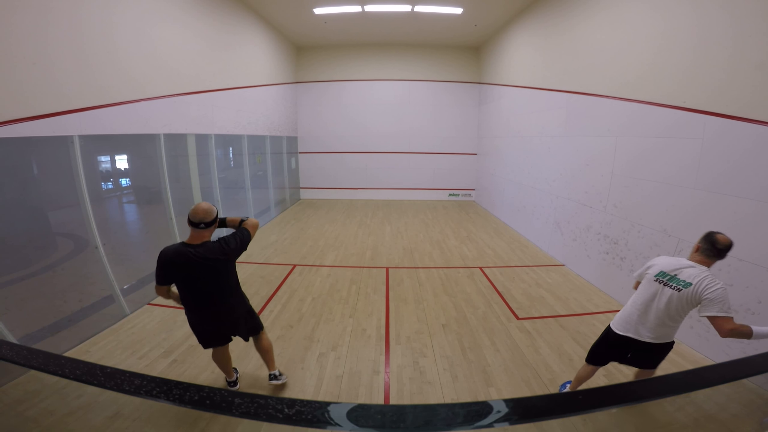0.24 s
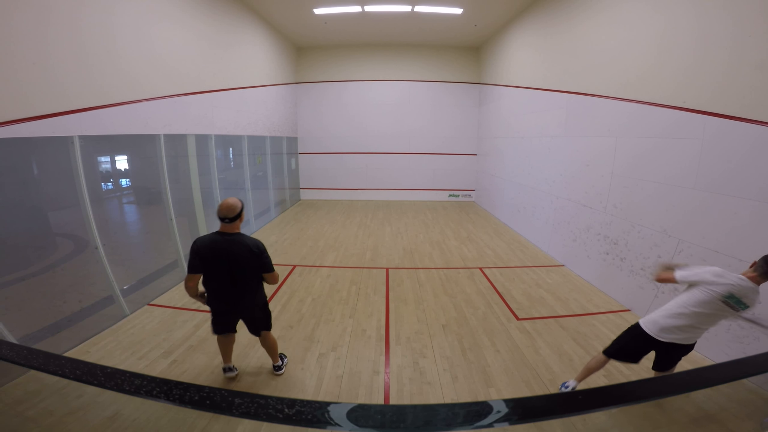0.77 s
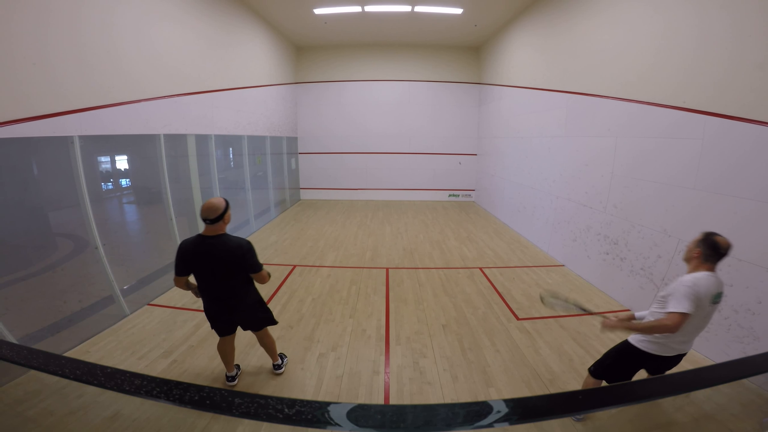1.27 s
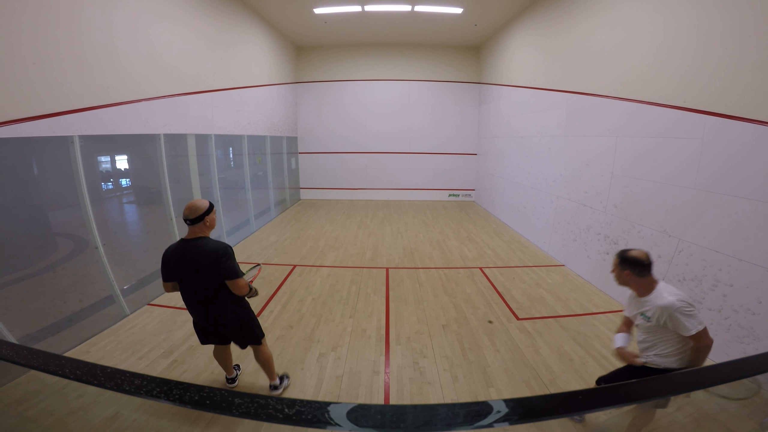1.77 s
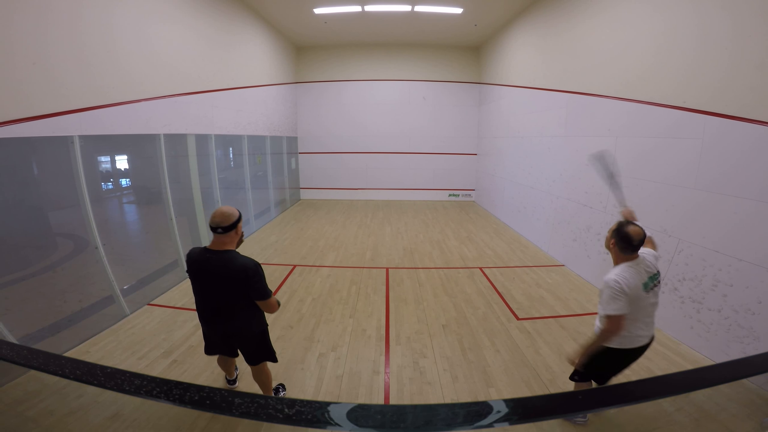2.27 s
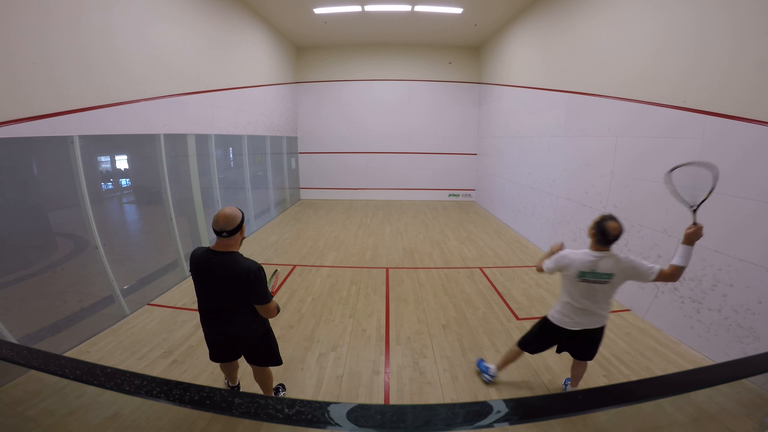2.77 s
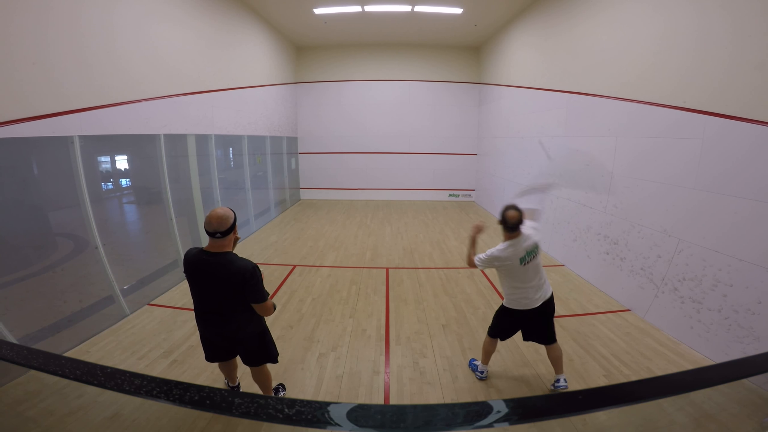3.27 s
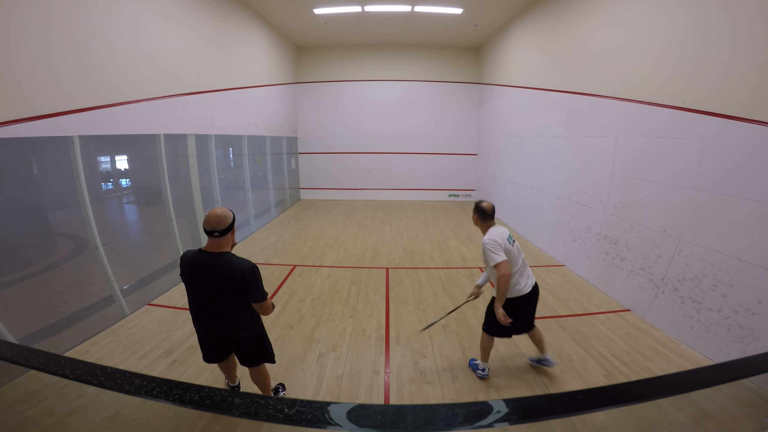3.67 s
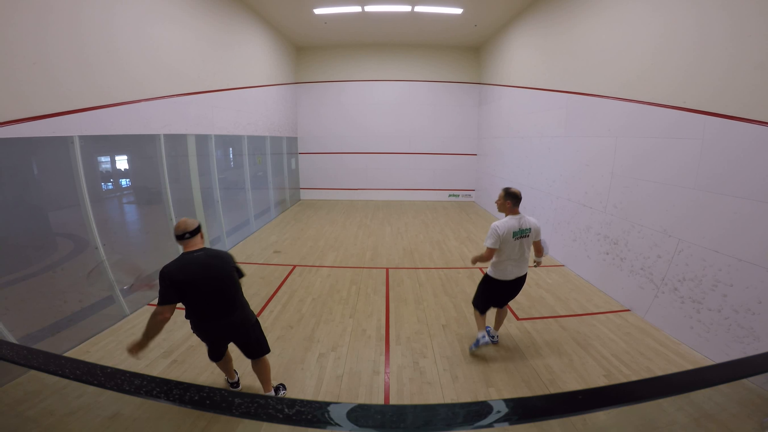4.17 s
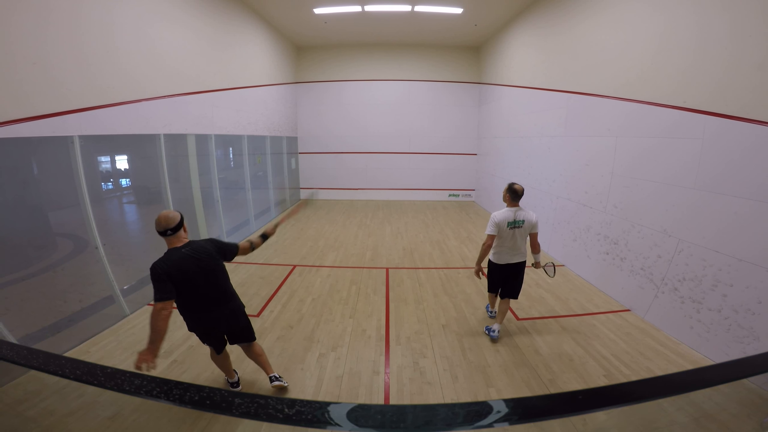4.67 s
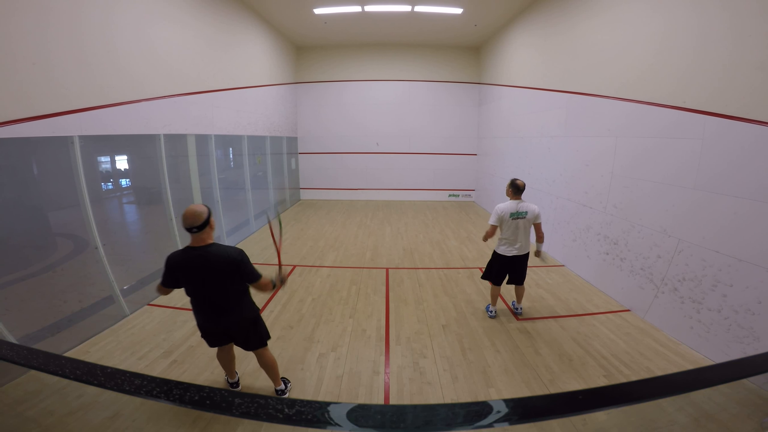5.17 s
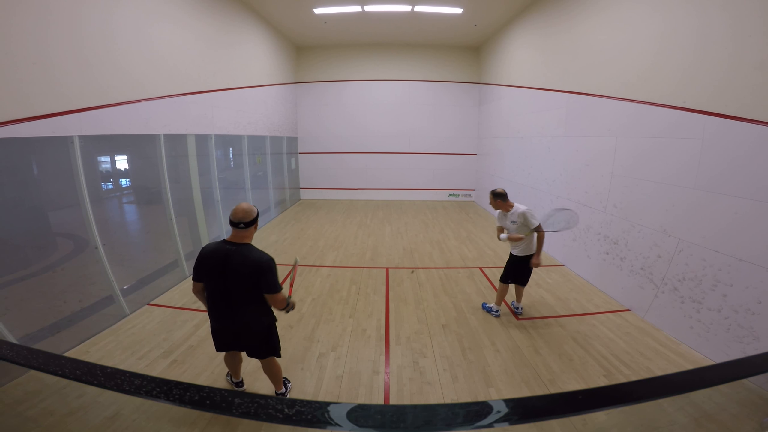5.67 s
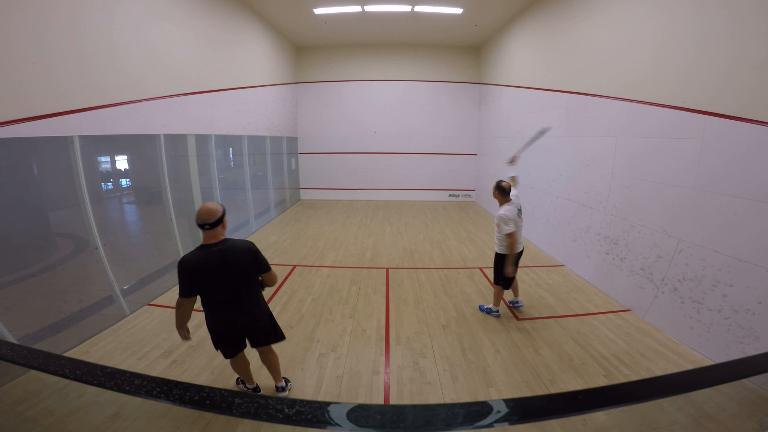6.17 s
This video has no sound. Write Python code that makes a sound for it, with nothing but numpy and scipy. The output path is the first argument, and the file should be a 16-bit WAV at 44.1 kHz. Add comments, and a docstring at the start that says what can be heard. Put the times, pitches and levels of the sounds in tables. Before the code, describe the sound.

The echo of an earlier wall hit is fading as a rally goes on in a bare, hard-walled court. Racquet cracks with a hollow pock alternate with louder, booming ball smacks on the front wall, about one impact every half to one second. The ball bounces dully on sprung boards, feet thud, and a sole squeaks faintly early on. Long reverberation and low hum fill the gaps; one fixed microphone at the back, mono.

```python
"""The echo of a ball on the front wall already rings through a closed court as the scene opens; a rally follows.
Racquets crack against a hollow rubber ball, which booms off the front wall and bounces on sprung boards.
Each blow is a minimum-phase pulse convolved with discrete reflections and a diffuse tail that rings for seconds.
The floor thuds as damped swings under feet and ball, and a sole squeaks as an unsteady tone; beating hum and
filtered-noise ventilation lie underneath."""
import sys
import numpy as np
from scipy import signal
from scipy.fft import rfft, irfft
from scipy.io import wavfile
from scipy.ndimage import uniform_filter1d

SR = 44100
rng = np.random.default_rng(int(sys.argv[2]) if len(sys.argv) > 2 else 0)


def put_to_file(sound):
    """Save the sound as 16-bit audio at rate SR, in the file named by the first command-line argument."""
    columns = np.atleast_2d(sound).T  # one column per channel
    safe = np.clip(columns, -1, 1)
    whole_steps = np.round(safe * 32767)
    wavfile.write(sys.argv[1], SR, whole_steps.astype(np.int16))


N = 283563
RING_SAMPLES = 3 * SR  # length of the court's response

# Ball on the front wall. Each row: start in seconds (negative: before the scene opens), boom peak in dB,
# boom lag in seconds, straight path in dB and early arrivals in dB (these two add up),
# then the blow's base level, thump, smack and crack in dB.
FRONT_WALL_HITS = [(-0.42, -20, .005, -8, 34, -16.5, 1, -3.5, 11),
                   (1.1134, -9.5, 0.009, -5, 34, -14.5, -1, 3.5, 11),
                   (2.3835, -8, 0.0028, -8, 35.5, -20, 2, -2.5, 6),
                   (3.575, -5.5, .012, -7, 37, -13, -.5, 2.5, 10),
                   (4.9257, -13, 0.0021, -9.5, 37, -19, -1, -3, 5),
                   (6.258, -21.5, .005, -7.5, 37.5, -20.5, 0, -3, 5.5)]


def racquets():
    """Impact excitation: a stroke cracks, the ball pocks, and the strings ping and sing on unsteadily."""
    # Each row: start in seconds, pock peak before its path levels in dB, string ping peak in dB,
    # string sustain at its onset in dB, the blow's base level, thump, smack and crack in dB,
    # string pitch in Hz, full string ring in dB.
    strokes = [(0.890, -13, -32, -49, -23.5, 3, 1.5, 2, 2120, -1),
               (2.015, -20.5, -33, -47.5, -32, 4, 0, 4, 1310, 7.5),
               (3.375, -17, -33, -49, -25, 4, 1.5, 0.5, 2044, -2.5),
               (4.552, -24, -42, -54, -36.5, 9, -2, 0.5, 1305, 7.5),
               (5.979, -31, -42.5, -50, -36, 11, -1, 8.5, 1345, 15.5)]
    # Spectrum of a racquet blow. Each row: frequency in Hz, relative level in dB.
    colour = [(60, -3), (170, -5), (335, 2), (520, -11), (700, -16.5), (860, -11), (1030, -14.5),
              (1450, -21.5), (2130, -18), (3000, -21.5), (3950, -16.5), (4850, -28.5), (7350, -21.5),
              (10000, -33.5), (12300, -28.5), (14800, -32.5)]
    # Arrivals from mid-court. Each row: delay in seconds, relative level in dB, smear in seconds.
    mid_paths = [(0, -6, 0.002), (.002, -2, 0.004), (0.017, -9.5, 0.0033), (0.03, -20, 0.0046),
                 (.044, -16.5, .006), (.055, -9, 0.018)]
    # The pock and its returns from side wall and ceiling. Each row: delay in seconds, level in dB.
    pock_paths = [(0.002, -7), (0.021, -9), (0.048, -7)]
    pock_hz, pock_peak_s, ping_peak_s = 338, 0.0031, 0.003
    sustain_t60_s, waver, waver_hz = 1.7, 0.55, 16

    out, t = np.zeros(N), np.arange(SR) / SR
    pock = swing(t, pock_peak_s) * np.sin(2 * np.pi * pock_hz * t)
    for s, pock_db, ping_db, sustain_db, *strike, string_hz, string_db in strokes:
        event = (s, *strike, string_hz, string_db)
        out += ball([event], colour, mid_paths, early_db=28.5, body_db=2, fill_s=0.015)
        ping = swing(t, ping_peak_s) * np.sin(2 * np.pi * string_hz * t)
        decay = np.exp(-np.log(1000) * t / sustain_t60_s)
        sustain = wavering(string_hz, waver, waver_hz)[:SR] * decay
        add(out, s, undb(ping_db) * ping + undb(sustain_db) * sustain)
        for delay, db in pock_paths:
            add(out, s + delay, undb(pock_db + db) * pock)
    return out


def wall_hits():
    """Impact and structural coupling: the ball smacks the front wall, which booms and shakes the floor."""
    # Spectrum of a wall blow. Each row: frequency in Hz, relative level in dB.
    colour = [(40, -29), (100, -0.5), (210, 0), (310, 6.5), (560, -7), (800, -7.5), (1080, -14.5),
              (1270, -17), (1920, -19.5), (3190, -25), (4050, -25), (5000, -41), (7200, -33.5),
              (10000, -40.5), (12000, -38), (14800, -44)]
    # Reflected paths from the front wall. Each row: delay in seconds, relative level in dB, smear in seconds.
    front_paths = [(.0052, -6.5, 0.0041), (.0066, -11.5, 0.001), (0.0128, -10, 0.0046),
                   (0.021, -13.5, 0.0063), (0.058, -14.5, 0.0067), (.066, -10.5, 0.006),
                   (.073, -14.5, .006), (.082, -18, 0.0049), (.108, -20, .012), (0.127, -20.5, 0.01),
                   (.143, -16, 0.0067)]
    straight_smear_s = 0.0063
    shake_lag_s, shake_db, shake_hz = 0.018, -20, 95

    out = wall_boom()
    for s, _, _, straight_db, early_db, *strike in FRONT_WALL_HITS:
        paths = [(0, straight_db, straight_smear_s), *front_paths]
        out += ball([(s, *strike)], colour, paths, early_db, body_db=-7, fill_s=0.062)
        add(out, s + shake_lag_s, undb(shake_db) * boards(shake_hz))
    return out


def wall_boom(low_hz=272, high_hz=350, high_db=-3, peak_s=0.0062):
    """Modal superposition: the struck wall swings for a few cycles in two modes."""
    out, t = np.zeros(N), np.arange(SR // 8) / SR
    low_mode = np.sin(2 * np.pi * low_hz * t)
    high_mode = undb(high_db) * np.sin(2 * np.pi * high_hz * t)
    boom = swing(t, peak_s) * (low_mode - high_mode)
    for s, db, lag_s, *_ in FRONT_WALL_HITS:
        add(out, s + lag_s, undb(db) * boom / abs(boom).max())
    return out


def bounces():
    """Impact on a compliant surface: the ball pats the floor and sets the boards swinging."""
    # Each row: start in seconds, board swing peak in dB, board pitch in Hz,
    # then the blow's base level, thump, smack and crack in dB.
    floor_hits = [(0.463, -16.5, 114, -32, 13.5, -6.5, 0), (1.817, -19.5, 150, -32, -19, -10, -15.5),
                  (5.727, -23.5, 122.5, -36, 12.5, 3.5, 7)]
    # Spectrum of a floor blow. Each row: frequency in Hz, relative level in dB.
    colour = [(50, -28.5), (115, 2.5), (220, -10), (600, -26.5), (1500, -33), (3100, -30), (3750, -30),
              (4600, -42.5), (7500, -45), (14000, -64.5)]
    # Arrivals from the floor. Each row: delay in seconds, relative level in dB, smear in seconds.
    floor_paths = [(0.0044, 0.0049, 0.0037)]

    out = np.zeros(N)
    for s, board_db, board_hz, *strike in floor_hits:
        out += ball([(s, *strike)], colour, floor_paths, early_db=31.0, body_db=-8, fill_s=0.01)
        add(out, s, undb(board_db) * boards(board_hz))
    return out


def ball(events, colour, paths, early_db, body_db, fill_s):
    """Convolution: every blow excites its own freshly drawn response of the court."""
    out = np.zeros(N)
    for s, *strike in events:
        response = court(paths, early_db, body_db, fill_s)
        add(out, s, signal.fftconvolve(blow(colour, *strike), response))
    return out


def blow(colour, level_db, thump_db, smack_db, crack_db, string_hz=1000, string_db=0, size=8192):
    """Spectral shaping of a contact pulse: thump, smack, crack, ball resonances and any string ring."""
    # Resonances of the ball. Each row: frequency in Hz, width in Hz, gain in dB.
    ball_modes = [(851, 131, 5), (3900, 310, 4.5)]
    # Modes of the string bed. Each row: multiple of the string pitch, share of the ring's dB.
    string_modes = [(1, 1), (1.58, 0.2), (2.12, 0.77)]
    string_width_hz, ripple_db = 110, 1.8

    hz = np.fft.rfftfreq(size, 1 / SR)
    db = on_log(hz, colour)
    db = db - 10 * np.log10(np.mean(undb(db) ** 2)) + level_db
    db = db + thump_db * bump(hz, 292, 0.5)
    db = db + smack_db * bump(hz, 830, 0.96)
    db = db + crack_db * bump(hz, 7600, 1.324)
    strings = [(multiple * string_hz, string_width_hz, share * string_db) for multiple, share in string_modes]
    for centre, width, gain_db in ball_modes + strings:
        db = db + gain_db / (1 + (2 * (hz - centre) / width) ** 2)
    # each contact has its own uneven set of small overtones
    overtones = unit(uniform_filter1d(rng.standard_normal(len(hz)), size=16))
    return causal(db + ripple_db * overtones * np.minimum(hz / 1500, 1))


def court(paths, early_db, body_db, fill_s, split_hz=900, air_hz=15000, dulling_s=0.14):
    """Early reflection and scattering: arrivals keep their bass; their treble smears and dulls with delay."""
    grain_db = 5  # unevenness within one arrival
    blur_share, shift_share = 0.05, 0.04  # onset blur and random time shift, as shares of the delay

    response = diffuse(fill_s=fill_s, thin_db=-1.5)
    t = np.arange(SR // 20) / SR
    push = butter(signal.unit_impulse(len(t)), split_hz, "low")
    for delay, db, smear in paths:
        scatter = rng.standard_normal(len(t)) * undb(grain_db * rng.standard_normal(len(t)))
        scatter = scatter * np.exp(-t / smear)
        scatter = scatter * np.minimum((t + 1 / SR) / (blur_share * abs(delay) + 1 / SR), 1)
        scatter = butter(scatter / np.linalg.norm(scatter), split_hz, "high")
        scatter = butter(scatter, min(air_hz / (1 + delay / dulling_s), .45 * SR), "low", order=1)
        arrival = delay * (1 + shift_share * rng.uniform(-1, 1))
        add(response, max(arrival, 0), undb(early_db + db) * (scatter + undb(body_db) * push))
    return response


def diffuse(build_s=0.021, fill_s=0.01, thin_db=-6, edge_s=0.0039):
    """Diffuse reverberation: bunched reflections build up, then decay exponentially, the treble first."""
    # Reverberation of the court. Each row: frequency in Hz, time to fall by 60 dB in seconds.
    court_t60 = [(90, 5.1), (200, 1.9), (400, 2.74), (950, 3.62), (2000, 2.72), (3900, 2.05), (6500, 0.9),
                 (9500, 0.47), (14000, 0.17)]
    bunch_db, bunch_hz, bunch_fade_s = 2.3, 160, 0.4  # bunches even out as the echo ages

    t = np.arange(RING_SAMPLES) / SR
    unevenness = unit(butter(rng.standard_normal(RING_SAMPLES), bunch_hz, "low"))
    gain = undb(bunch_db * np.exp(-t / bunch_fade_s) * unevenness)
    bunches = gain / np.sqrt(uniform_filter1d(gain ** 2, size=SR // 25))
    hz = np.fft.rfftfreq(RING_SAMPLES, 1 / SR)
    noise = rfft(bunches * rng.standard_normal(RING_SAMPLES))
    # overlapping triangular bands, each with its own decay
    place = on_log(hz, [(f, k) for k, (f, _) in enumerate(court_t60)])
    tail = np.zeros(RING_SAMPLES)
    for k, (_, t60) in enumerate(court_t60):
        band = irfft(noise * np.maximum(1 - abs(place - k), 0), RING_SAMPLES)
        tail += band * np.exp(-np.log(1000) * t / t60)
    unfilled = .5 - .5 * np.tanh((t - fill_s) / edge_s)
    return tail * (1 - np.exp(-t / build_s)) * undb(thin_db * unfilled)


def thuds_and_knocks():
    """Impact response: low floor thuds, short hollow knocks, and light, uneven steps."""
    # Low floor thuds, from heavy footfalls or from the boards answering the ball.
    # Each row: start in seconds, swing peak in dB, board pitch in Hz.
    floor_thuds = [(0.561, -19, 97.4), (0.669, -20.5, 83.4), (0.792, -13.5, 82), (0.856, -12.5, 91),
                   (1.618, -18, 96), (2.891, -20, 113), (2.999, -15.5, 85.5), (3.052, -17, 88.6),
                   (3.38, -20, 107), (4.109, -21, 128.4), (4.352, -19.5, 103.6), (5.139, -23.5, 155),
                   (5.352, -21.5, 96.6), (5.781, -26, 121.4), (6.37, -14.5, 74.5)]
    # Hollow knocks: the floor answering a ball or step, and a stroke's returning pock.
    # Each row: start in seconds, swing peak in dB, pitch in Hz.
    hollow_knocks = [(5.783, -24, 200), (6.004, -22, 275), (6.148, -22, 282)]
    stride_s, stride_scatter = 0.4, 0.25  # scatter as a share of the stride
    light_db, light_scatter_db = -32, 3
    board_hz, board_scatter_octaves = 114.8, 0.27

    out = np.zeros(N)
    for s, db, hz in floor_thuds:
        add(out, s, undb(db) * boards(hz))
    for s, db, hz in hollow_knocks:
        add(out, s, undb(db) * boards(hz, decay_s=0.011, room_db=-14))
    for k, (late, force, spot) in enumerate(rng.standard_normal(size=(16, 3))):
        light_step = boards(board_hz * 2 ** (board_scatter_octaves * spot))
        level_db = light_db + light_scatter_db * force
        add(out, (k + stride_scatter * late) * stride_s, undb(level_db) * light_step)
    return out


def boards(hz, rise_s=0.0066, decay_s=0.034, room_db=-13, room_s=0.31):
    """Damped oscillation: a struck body swings for a few cycles and leaves a low rumble near its pitch."""
    t = np.arange(SR) / SR
    rise = 1 - np.exp(-(t / rise_s) ** 2)
    swell = rise * np.exp(-t / decay_s)
    rumble = butter(rng.standard_normal(SR), 0.89 * hz, "low")
    rumble = unit(butter(rumble, 1.0 * hz, "high"))
    tone = swell / swell.max() * np.sin(2 * np.pi * hz * t)
    return tone + undb(room_db) * rise * np.exp(-t / room_s) * rumble


def squeaks(waver=0.024, waver_hz=200):
    """Frictional oscillation: a rubber sole slips at an unsteady rate, heard only through its echo."""
    # Faint shoe squeaks. Each row: start in seconds, length in seconds, pitch in Hz, level in dB.
    slips = [(0.524, .12, 3780, -47.5), (0.631, .12, 3790, -54.5)]

    out = np.zeros(N)
    for s, length, hz, db in slips:
        count = int(length * SR)
        rate = hz * (1 + waver * unit(butter(rng.standard_normal(SR), waver_hz, "low"))[:count])
        slip = np.sin(2 * np.pi * np.cumsum(rate) / SR) * np.hanning(count)
        add(out, s, undb(db) * signal.fftconvolve(slip / np.linalg.norm(slip), diffuse()))
    return out


def hum():
    """Beating: two close, deep tones throb 3.5 times a second while their level swells and sinks."""
    # The two tones. Each row: frequency in Hz, relative level in dB.
    deep_tones = [(55.4, 8.5), (58.9, -3.5)]
    # Course of the hum. Each row: time in seconds, level in dB.
    hum_level = [(0, -31), (0.68, -31.5), (0.85, -28), (1.899, -32), (2.951, -27.5), (3.25, -41),
                 (4.0, -33), (5.8, -45.5), (6.43, -26)]

    tones = sum(undb(db) * wavering(hz, waver=0.14, waver_hz=1.8) for hz, db in deep_tones)
    level_db = np.interp(np.arange(N) / SR, *np.transpose(hum_level))
    return undb(level_db) * unit(tones)


def ventilation():
    """Broadband flow noise and tonal radiation: dull moving air and a wavering fan tone."""
    # Spectrum of the air. Each row: frequency in Hz, relative spectral level in dB.
    air_colour = [(20, -8), (38, 1.5), (70, 1), (110, -15.5), (200, -11.5), (340, -15.5), (520, -27),
                  (850, -19.5), (1500, -36.5), (3800, -41.5), (6000, -105.5), (12000, -92)]
    # Fan tone. Each row: frequency in Hz, level in dB.
    fan_tones = [(87, -39)]
    air_db = -33

    gain = undb(on_log(np.fft.rfftfreq(N, 1 / SR), air_colour))
    air = irfft(rfft(rng.standard_normal(N)) * gain, N)
    fan = sum(undb(db) * wavering(hz, waver=0.18, waver_hz=2.1) for hz, db in fan_tones)
    return undb(air_db) * unit(butter(air, 9.6, "high")) + fan


def wavering(hz, waver, waver_hz):
    """Quadrature modulation: a tone of rms 1 whose strength and phase wander."""
    turn = 2 * np.pi * hz * np.arange(N) / SR
    a, b = (waver * unit(butter(rng.standard_normal(N), waver_hz, "low")) for _ in range(2))
    return unit((1 + a) * np.sin(turn) + b * np.cos(turn))


def swing(t, peak_s):
    """Critically damped envelope: it rises to 1 at peak_s and dies away."""
    return t / peak_s * np.exp(1 - t / peak_s)


def causal(db, size=8192):
    """Minimum phase: folding the cepstrum gives the most abrupt response with this spectrum."""
    cepstrum = irfft(np.log(undb(db)))
    cepstrum[1:size // 2] *= 2
    cepstrum[size // 2 + 1:] = 0
    return irfft(np.exp(rfft(cepstrum)))[:size // 2]


def bump(hz, centre_hz, octaves):
    """Gaussian weighting: a smooth hill on the log-frequency axis."""
    return np.exp(-.5 * (np.log2((hz + 1e-9) / centre_hz) / octaves) ** 2)


def on_log(hz, points):
    """Log-frequency interpolation: join (Hz, value) points."""
    f, value = np.transpose(points)
    return np.interp(np.log(hz + 1e-9), np.log(f), value)


def butter(x, hz, kind, order=2):
    """Butterworth filtering: a maximally flat low-pass or high-pass."""
    return signal.sosfilt(signal.butter(order, hz, kind, fs=SR, output="sos"), x)


def undb(db):
    """Logarithmic level: decibels to amplitude gain."""
    return 10 ** (np.asarray(db) / 20)


def unit(x):
    """Power normalization: scale to rms 1."""
    return x / np.sqrt(np.mean(x ** 2))


def add(out, s, x):
    """Superposition: mix x into out from time s, dropping what falls outside the scene."""
    start = int(round(s * SR))
    x, start = x[max(-start, 0):], max(start, 0)
    out[start:start + len(x)] += x[:N - start]


def scene():
    """Superposition of the rally, the thuds and squeaks, and the air of the hall, in one channel."""
    rally = racquets() + wall_hits() + bounces()
    return (rally + thuds_and_knocks() + squeaks() + hum() + ventilation())[None]


def record(dry):
    """Soft saturation and band limiting: the microphone rounds the loudest peaks and cuts the top."""
    top_cut = signal.ellip(8, .2, 70, 14900, fs=SR, output="sos")  # low-pass edge in Hz
    return signal.sosfilt(top_cut, np.tanh(dry))


dry = scene()
out = record(dry)
put_to_file(out)
```